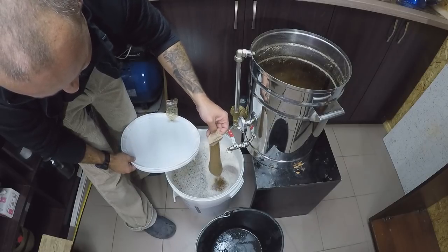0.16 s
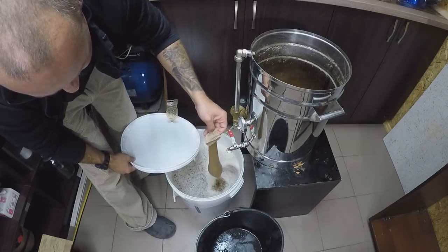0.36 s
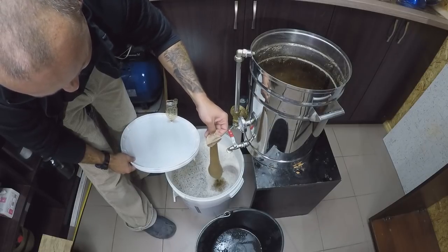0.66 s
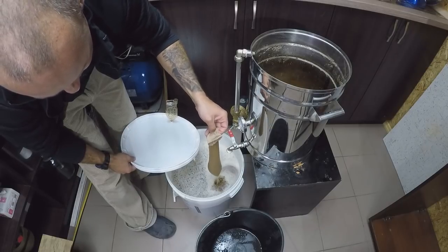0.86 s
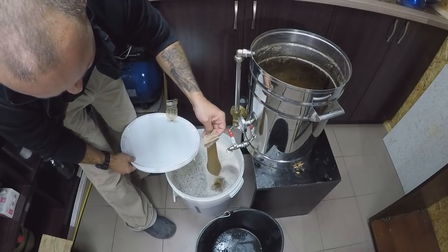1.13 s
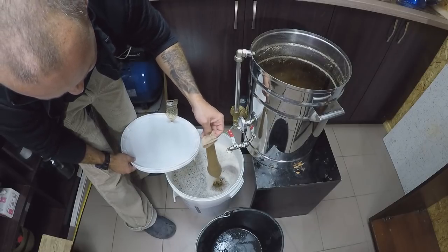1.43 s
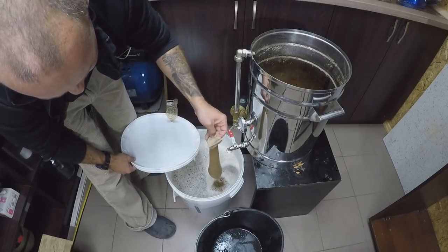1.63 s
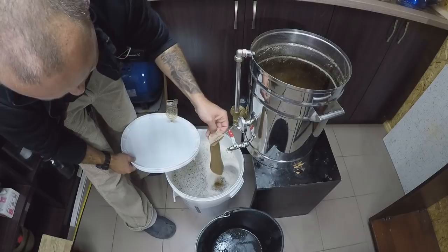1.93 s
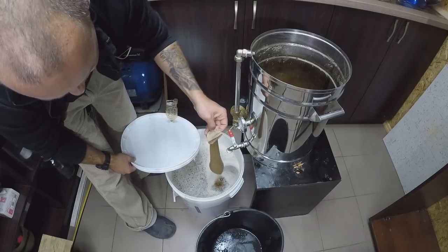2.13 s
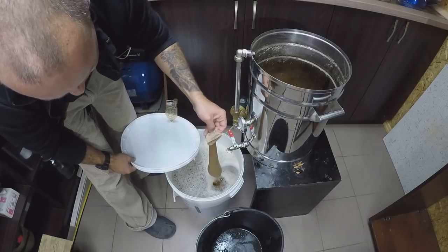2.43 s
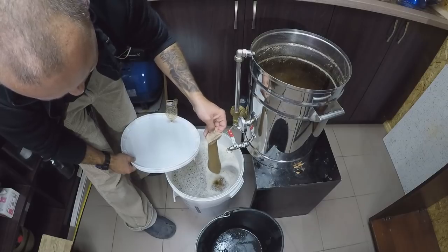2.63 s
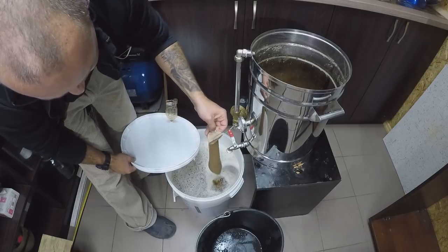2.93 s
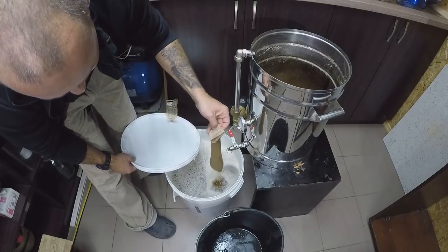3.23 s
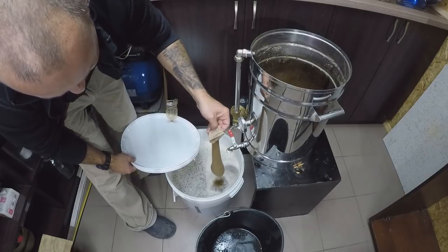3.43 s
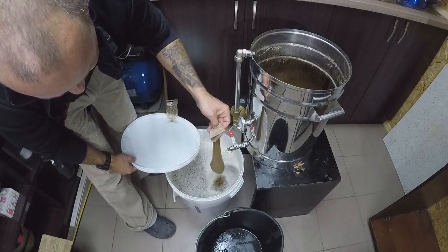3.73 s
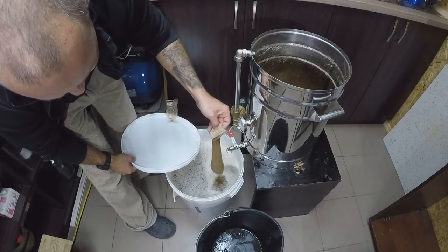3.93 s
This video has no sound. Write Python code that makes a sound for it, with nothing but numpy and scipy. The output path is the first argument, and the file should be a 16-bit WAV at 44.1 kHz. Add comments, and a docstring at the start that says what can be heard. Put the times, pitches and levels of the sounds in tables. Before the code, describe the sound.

A close stereo pickup of dripping in a hard-floored kitchen: quick clusters of high, glassy drops and rounder low plops fall into liquid, each with a tiny click, spray and fizzing bubbles. An opening cluster gives way to soft rubbing and two muffled bumps, then steady uneven dripping continues to the end. Quiet low room hum and a thin high whistle stay constant; bucket reflections and a short tail colour the drops.

```python
"""Kitchen with a tiled floor: liquid drips from a wet cloth filter into a half-full bucket.
Drops ring as short gliding sines, with clicks, spray, ticks and a trickle of small bubbles.
Early bounces and a decaying noise tail throw the water back to the two ports of a small camera.
Filtered noise makes a soft hum, a thin whistle, a narrow hiss and a dull rustle;
two low damped sines make the bumps."""
import sys
import numpy as np
from scipy import signal
from scipy.fft import rfft, irfft, next_fast_len
from scipy.io import wavfile

SR = 44100
rng = np.random.default_rng(int(sys.argv[2]) if len(sys.argv) > 2 else 0)


def dump_mix(stems):
    """Bounce the given channels to the path in sys.argv[1] as a 16-bit WAV at rate SR."""
    frames = np.atleast_2d(stems).T  # one column per channel
    limited = np.clip(frames, -1, 1)  # hard clip at full scale
    pcm = np.round(limited * 32767).astype(np.int16)
    wavfile.write(sys.argv[1], SR, pcm)


def field_ratio(decibels):
    """Amplitude ratio for a level in dB (20 dB per decade); scalars and array-likes work."""
    return 10 ** (np.asarray(decibels, dtype=float) / 20)


N = 179284
SIZE = next_fast_len(N + SR)   # FFT length, padded by 1 s
HZ = np.maximum(np.arange(SIZE // 2 + 1) * SR / SIZE, 1)

# loud bubbles, levels at the source: start_s, peak_db, pitch_hz
LOUD_BUBBLES = [(0.002, -40.5, 3470), (0.004, -48, 4700), (0.003, -49, 2680), (0.029, -51, 940),
                (0.0401, -41, 3315), (0.0535, -41.5, 1100), (0.0726, -37.5, 935), (0.1, -42.5, 930),
                (0.122, -50, 2100), (0.14, -57, 2130), (1.2467, -44, 1870), (1.015, -49, 1870),
                (1.484, -47, 1490), (1.511, -46, 2400), (2.2905, -42, 1085), (2.465, -48, 2430),
                (3.69, -55, 2290), (3.745, -45.5, 1890), (3.789, -57, 2030), (0.404, -50, 1200),
                (0.442, -49, 1180), (0.485, -47, 1200), (0.471, -48, 1600), (0.409, -52, 1600),
                (0.505, -53, 740), (0.31, -51, 1040), (0.495, -49, 780), (0.1534, -45.5, 7050),
                (0.6295, -44, 2130), (0.709, -46.5, 1344), (0.9146, -45, 2050), (1.0514, -42, 2990),
                (1.076, -44, 2690), (1.206, -51, 5940), (1.4183, -59, 1640), (1.441, -49, 1080),
                (1.5601, -47, 1730), (1.604, -45.5, 3430), (1.804, -50, 1320), (1.804, -46.5, 2000),
                (1.823, -50, 3130), (2.15, -50, 4430), (2.898, -46, 4600), (3.177, -49, 5470),
                (3.28, -44, 4570), (3.555, -47.5, 5500), (3.5735, -47, 2600), (3.6567, -46, 2560),
                (3.703, -43, 6450), (3.7692, -47, 1410), (3.755, -41.5, 7150), (3.936, -60, 2690),
                (0.1944, -36, 1501), (0.203, -43, 7670), (0.1724, -42, 3750), (0.196, -38.5, 4460),
                (0.205, -29, 3380), (0.4843, -43, 4300), (0.532, -38.5, 6770), (0.532, -42.5, 3750),
                (0.6314, -44.5, 1480), (0.706, -44, 910), (0.715, -42, 7570), (0.716, -43, 1710),
                (0.8511, -38, 3526), (0.8502, -43, 8700), (0.852, -42.5, 1980), (0.881, -45, 1450),
                (2.237, -47.5, 7000), (0.8885, -41.5, 2350), (0.8885, -38, 7300), (0.917, -40, 6850),
                (0.9623, -51, 870), (0.972, -39, 6400), (1.016, -41, 7070), (1.0124, -37.5, 3650),
                (1.0186, -28, 3120), (1.015, -46, 1265), (1.03, -45, 1290), (1.0765, -40, 1720),
                (1.188, -43.5, 7450), (1.1872, -42, 3530), (1.2048, -38, 1367), (1.215, -41, 5600),
                (1.232, -41, 7200), (1.2467, -31.5, 6080), (1.248, -31.5, 7260), (1.245, -40.5, 1310),
                (1.222, -43, 1340), (1.2465, -33, 3365), (1.313, -34.5, 2080), (1.33, -43, 2100),
                (1.3134, -33.5, 6640), (1.3119, -37.5, 1372), (1.3555, -42.5, 2940), (1.4188, -40, 6500),
                (1.4888, -44, 1147), (1.5087, -39.5, 2000), (1.505, -49, 7000), (1.519, -45.5, 5470),
                (1.553, -41.5, 4650), (1.5612, -41.5, 6740), (1.589, -37, 7040), (1.6226, -46, 1510),
                (1.6246, -37.5, 5500), (1.6966, -54.5, 3520), (1.717, -42.5, 4400), (1.535, -45, 2120),
                (1.698, -44.5, 1880), (1.6987, -36, 6440), (1.709, -44, 1870), (1.715, -44, 6440),
                (1.7446, -39, 1292), (1.745, -42, 2900), (1.908, -41.5, 3520), (1.927, -34, 7840),
                (1.932, -43, 7230), (1.9546, -40, 973), (1.961, -42, 2390), (1.9705, -38, 5280),
                (1.995, -38, 2300), (2.0016, -35, 7100), (2.1048, -39.5, 1820), (2.106, -35.5, 7040),
                (2.1297, -41.5, 2690), (2.2865, -34, 790), (2.2907, -38, 1402), (2.3111, -38, 2850),
                (2.3391, -36, 7250), (2.372, -45, 955), (2.32, -48, 797), (0.75, -50, 966),
                (1.99, -42, 910), (2.5414, -45.5, 1090), (2.5418, -42, 1900), (2.5432, -44, 3880),
                (2.5679, -34, 5740), (2.5877, -31.5, 1145), (2.5895, -27.5, 2406), (2.592, -32.5, 1670),
                (2.618, -39, 5630), (2.6174, -30, 3610), (2.631, -36, 820), (2.676, -37.5, 1286),
                (2.6839, -41.5, 810), (2.743, -44.5, 1420), (2.7445, -30, 6960), (2.7448, -29, 3070),
                (2.9272, -36.5, 3350), (2.945, -42, 2870), (2.9732, -37, 893), (2.987, -33.5, 2980),
                (3.004, -33.5, 6760), (3.0475, -31.5, 982), (3.0504, -37.5, 5530), (3.1011, -37, 5860),
                (3.105, -42, 2920), (3.1348, -40, 7270), (3.152, -40.5, 3450), (3.245, -43.5, 7840),
                (3.255, -41, 2720), (3.2539, -43, 1970), (3.28, -36.5, 6130), (3.29, -38, 6630),
                (3.3141, -43.5, 866), (3.3265, -36.5, 7440), (3.327, -46, 2910), (3.353, -32.5, 3300),
                (3.355, -31.5, 6200), (3.425, -44, 703), (3.4335, -45, 3080), (3.434, -46, 1110),
                (3.5577, -50.5, 8700), (3.5855, -43.5, 6100), (3.602, -41.5, 3420), (3.6215, -42, 3230),
                (3.6353, -42, 6100), (3.6574, -37.5, 4220), (3.675, -38, 7400), (3.675, -37, 3170),
                (3.7002, -43, 1730), (3.7311, -38.5, 2070), (3.729, -46, 5600), (3.772, -42.5, 2500),
                (3.808, -45, 2630), (3.8266, -30, 5940), (3.831, -31, 6960), (3.8294, -40, 3470),
                (3.828, -42, 1310), (3.957, -46, 3520), (3.9645, -31.5, 3480), (3.964, -43, 5900),
                (3.9741, -38, 854)]
# colour of slaps and spray: freq_hz, gain_db
SPLASH_COLOUR = [(500, -25), (1000, -13), (2400, 1), (3500, 11.5), (4800, 5), (7150, 22), (9500, -3),
                 (12500, -5.5), (15500, -15)]


def in_time(rows):
    """Curve read at every sample."""
    return np.interp(np.arange(N) / SR, *np.transpose(rows))


def at_hz(points, hz, axis=1):
    """Table column read on a log-frequency axis."""
    points = np.array(points)
    return np.interp(np.log(hz), np.log(points[:, 0]), points[:, axis])


def rms_one(x):
    """Scaled to rms 1."""
    return x / np.sqrt(np.mean(x ** 2) + 1e-20)


def shaped(x, response):
    """x through a frequency response given on HZ."""
    return irfft(rfft(x, SIZE) * response, SIZE)[..., :N]


def drift(rate_hz):
    """Random curve: straight lines between unit-variance knots, rate_hz knots a second."""
    knots = rng.standard_normal(int(N / SR * 60) + 2)
    return np.interp(np.arange(N) / SR * rate_hz, np.arange(len(knots)), knots)


def spread(pair, side_gain):
    """Two unrelated sounds become mid and side, then left and right."""
    # left port weaker near 8 kHz: freq_hz, half of left-minus-right db
    left = field_ratio(at_hz([(7000, -0.2), (8400, -2.5), (10500, -0.8), (14000, 0.5)], HZ))
    mid, side = pair[0], shaped(pair[1], side_gain)
    return shaped(np.array([mid + side, mid - side]), np.array([left, 1 / left]))


def add(out, start_s, peak_db, hz, cycles, rise, onset_cycles=0.57):
    """Adds a sine that swells, falls 20 dB in `cycles`, and glides by `rise` of its pitch a cycle."""
    at = max(int(start_s * SR), 0)
    cycles = np.clip(cycles, 1, 40)
    turn = np.arange(int(3 * cycles * SR / hz)) * hz / SR   # elapsed cycles
    shape = (1 - np.exp(-turn / onset_cycles)) * field_ratio(-20 * turn / cycles)
    phase = 2 * np.pi * (turn + rise * turn ** 2 / 2)
    tone = shape / shape.max() * np.sin(phase)
    out[at:at + len(tone)] += field_ratio(peak_db) * tone[:max(N - at, 0)]


def air():
    """Steady room tone: coloured noise with a slight level flutter."""
    # spectrum shape: freq_hz, relative_db_per_hz
    air_colour = [(25, -35), (100, -30), (113, -54), (137, -2.5), (170, -1), (300, -6.5), (560, -14),
                  (1200, -20.5), (1900, -26), (3400, -23), (5000, -31), (7450, -23), (8850, -25.5),
                  (12800, -33), (15500, -44)]
    level_db = -53.5 + 0.68 * drift(27.0)
    noise = rng.standard_normal((2, N))
    return field_ratio(level_db) * rms_one(shaped(noise, field_ratio(at_hz(air_colour, HZ))))


def whistles():
    """Noise through narrow resonances, stronger on the right and inverted on the left."""
    # thin whistle, narrow hiss: freq_hz, right_db, width_hz, left_minus_right_db
    lines = [(8104, -70, 8, -4), (8560, -63, 220, -10)]
    out = 0
    for hz, right_db, width_hz, pan_db in lines:
        resonance = 1 / (1 + (2 * (HZ - hz) / width_hz) ** 2)
        line = rms_one(shaped(rng.standard_normal(N), resonance))
        out = out + field_ratio(right_db) * line * np.array([[-field_ratio(pan_db)], [1]])
    return out


def drops(bubbles):
    """Each trapped bubble rings as a damped sine, with glide and ring length a little its own."""
    # typical ring length until 20 dB down: pitch_hz, length_cycles
    ring_cycles = [(800, 9.7), (1300, 15.5), (2300, 7.3), (3500, 19.5), (6500, 23), (9000, 42)]
    # typical glide, lowest sag and highest climb: pitch_hz, pitch_share_per_cycle
    glide = [(800, -0.0019), (1500, 0.00042), (3000, -0.00074), (7000, 0.0015)]
    out = np.zeros(N)
    chances = rng.standard_normal((len(bubbles), 2))
    for (start_s, peak_db, hz), (bend, length) in zip(bubbles, chances):
        cycles = at_hz(ring_cycles, hz) * np.exp(0.49 * length)
        rise = at_hz(glide, hz) + 0.0012 * bend
        add(out, start_s - 0.3 / hz, peak_db, hz, cycles, rise)
    return out


def siblings(count=4, mean_lag_s=0.0074, range_octaves=0.618, range_db=13.0):
    """Air dragged under breaks up: a few bubbles of like size soon follow; rows like LOUD_BUBBLES."""
    # mid level against the main bubble: pitch_hz, level_db
    breakup = [(900, -25.5), (1800, -15.5), (3200, -13), (5500, -10), (9000, -13)]
    late, pitch, loud = np.moveaxis(rng.random((len(LOUD_BUBBLES), count, 3)), -1, 0)
    main_s, main_db, main_hz = np.transpose(LOUD_BUBBLES)[..., None]
    start_s = main_s - mean_lag_s * np.log(late)
    peak_db = main_db + at_hz(breakup, main_hz) + range_db * (loud - .5)
    hz = main_hz * 2 ** (range_octaves * (pitch - .5))
    return np.reshape([start_s, peak_db, hz], (3, -1)).T


def trickle(count=3200):
    """Small bubbles at random moments and pitches, louder as the flow swells; rows like LOUD_BUBBLES."""
    # strength of the flow, only its swing about the mean counts: time_s, level_db
    flow = [(0.0, -35), (0.07, -48), (0.3, -51.5), (0.94, -44), (1.11, -49), (1.34, -48), (1.41, -51),
            (1.55, -48.5), (1.86, -52), (2.22, -47.5), (2.35, -50.5), (3.08, -47.5), (3.2, -51),
            (3.27, -44), (3.5, -60), (3.61, -48), (3.78, -52.5), (3.9, -50), (4.06, -39)]
    # colour: pitch_hz, gain_db
    trickle_colour = [(800, -5), (1500, -4), (3000, -1.5), (4500, -3.5), (7000, 7), (9500, -11.5)]
    mean_db, range_db, flow_gain = -61, 16, 0.81   # mean before colour
    low_hz, high_hz = 800, 9500
    when, pitch, loud = rng.random((count, 3)).T
    start_s = when * N / SR
    swing_db = np.interp(start_s, *np.transpose(flow)) - in_time(flow).mean()
    peak_db = mean_db + flow_gain * swing_db + range_db * (loud - .5)
    hz = low_hz * (high_hz / low_hz) ** pitch
    return np.transpose([start_s, peak_db + at_hz(trickle_colour, hz), hz])


def slaps(bubbles, slap_db=0, db_per_octave=8):
    """A drop meeting the surface clicks: a coloured impulse, stronger for high-pitched drops."""
    # drops that land flat, level before colour: start_s, click_db
    smacks = [(0.851, -41), (1.0135, -37), (1.2455, -25), (1.2488, -34), (1.3122, -33), (2.7445, -57),
              (3.354, -33), (3.826, -39)]
    out = np.zeros(N)
    for start_s, peak_db, hz in bubbles:
        at = min(int((start_s - .7 / hz) * SR), N - 1)
        out[at] += field_ratio(peak_db + slap_db + db_per_octave * np.log2(hz / 4000))
    for start_s, click_db in smacks:
        out[int(start_s * SR)] += field_ratio(click_db)
    return shaped(out, field_ratio(at_hz(SPLASH_COLOUR, HZ)))


def spray(count=16, mean_lag_s=.022, offset_db=-26.5):
    """Each loud drop throws up droplets that fall back soon after and trap quieter bubbles."""
    out = np.zeros(N)
    draws = rng.random((len(LOUD_BUBBLES), count, 4))
    for (start_s, peak_db, hz), droplets in zip(LOUD_BUBBLES, draws):
        for late, pitch, loud, length in droplets:
            small_hz = np.clip(hz * 3.5 ** (pitch - .45), 600, 14000)
            colour_db = at_hz(SPLASH_COLOUR, small_hz) - at_hz(SPLASH_COLOUR, hz)
            small_db = peak_db + offset_db + colour_db + 4.2 * loud ** 2
            small_s = start_s - mean_lag_s * np.log(late)
            add(out, small_s, small_db, small_hz, 8.8 + 2.2 * length, .004)
    return out


def ticks(cycles=4.0):
    """Tiny droplets burst, ringing so briefly that they only tick."""
    # levels at the source: start_s, peak_db, pitch_hz
    bursts = [(0.0836, -42.5, 11400), (0.179, -43, 10400), (0.889, -38, 10600), (1.0121, -41, 12700),
              (1.0184, -40, 12500), (0.851, -44, 12500), (1.2455, -37, 11300), (1.312, -45, 10900),
              (1.4321, -45, 11100), (1.5933, -42, 12100), (1.701, -35.5, 10600), (1.9704, -42, 13300),
              (2.2872, -43, 12600), (2.5656, -44, 10800), (2.7445, -40, 11800), (3.0016, -45, 13300),
              (3.1346, -41, 10900), (3.6346, -46, 11000), (3.6567, -39, 11000), (3.731, -44, 10700),
              (3.7534, -43, 9900), (3.9694, -35.5, 9600)]
    out = np.zeros(N)
    for start_s, peak_db, hz in bursts:
        add(out, start_s, peak_db, hz, cycles, 0, onset_cycles=1.0)
    return out


def rustle():
    """Short dull rubbing: grainy coloured noise with a few held pitches."""
    # level course before flutter: time_s, level_db
    course = [(.27, -66), (.31, -57.5), (.36, -51.5), (.42, -54), (.5, -51.5), (.56, -55), (.62, -56),
              (.7, -69)]
    # colour: freq_hz, gain_db
    rub_colour = [(150, -45), (250, 2), (450, 7), (750, 5), (1300, 5.5), (1800, -1), (2500, -13),
                  (3300, -28)]
    # held pitches: freq_hz, extra_gain (linear), half_width_hz
    held = [(741, 4.3, 11), (1200, 0.98, 8.2), (1600, 1.8, 11.6), (2434, 8, 8.4)]
    peaks = sum(gain / (1 + ((HZ - hz) / half_hz) ** 2) for hz, gain, half_hz in held)
    band = field_ratio(at_hz(rub_colour, HZ)) * (1 + peaks)
    grains = rng.standard_normal((2, N)) * field_ratio(1.34 * drift(45.0))
    level_db = in_time(course) + 0.25 * drift(55.0)
    return field_ratio(level_db) * rms_one(shaped(grains, band))


def thuds():
    """Soft low bumps: a padded blow on something hollow, two damped sines thinned below 140 Hz."""
    # lower sine, level before the high-pass: start_s, peak_db, pitch_hz, cycles_to_minus_20_db
    blows = [(0.312, -33, 196.5, 3), (0.556, -32.5, 190, 5)]
    out = np.zeros(N)
    for start_s, peak_db, hz, cycles in blows:
        add(out, start_s - .004, peak_db, hz, cycles, -.01, onset_cycles=3.7)
        add(out, start_s - .004, peak_db - 9.0, 1.55 * hz, 4.0, 0, onset_cycles=2.3)
    return signal.sosfilt(signal.butter(8, 140, "high", fs=SR, output="sos"), out)


def direct(x):
    """Straight path and early bounces reach the two ports with unequal level and phase."""
    # port difference: freq_hz, left_minus_right_db, right_lead_rad
    port_side = [(470, 4, 1.6), (790, -5, 1.9), (1157, -3, 1.5), (1800, -3.5, 0.4), (2640, -1, 0.48),
                 (6000, 2, 0.8), (7340, 0, 2), (8420, 2, 4.1), (12000, -7, 7), (13800, -4, 11)]
    # bounces off bucket wall, floor and kettle: delay_s, level_db
    early = [(0.0013, -34), (0.0029, -13), (0.005, -10), (0.0074, -35), (0.0101, -14.5), (0.0138, -10)]
    tilt = field_ratio(at_hz(port_side, HZ) / 2) * np.exp(-.5j * at_hz(port_side, HZ, axis=2))
    bounce = 1
    for k, (delay_s, level_db) in enumerate(early):
        bounce = bounce + (-1) ** k * field_ratio(level_db) * np.exp(-2j * np.pi * HZ * delay_s)
    return shaped(x, np.array([tilt, 1 / tilt]) * bounce)


def kitchen(x, ramp_s=0.0015, lumpy_db=-3.0):
    """Convolves with two unrelated noise tails, each octave decaying at its own pace, plus held pitches."""
    # decay: freq_hz, t60_s
    room_t60 = [(300, 0.29), (1000, 0.33), (3000, 0.27), (7000, 0.25), (13000, 0.29)]
    # pitches that bucket and room hold on to: pitch_hz
    rings_hz = [767, 836, 872, 946, 982, 1124, 1181, 1268, 1332, 1459, 1590, 1734, 1905, 2030, 2083, 2401,
                2468, 2547, 2713, 2861]
    # echo strength: freq_hz, gain_db
    wet = [(300, -21), (900, -33.5), (2000, -26), (3500, -26), (7000, -23.5), (12000, -23)]
    ring_1khz_db, ring_db_per_octave, ring_t60_s = -19.5, -3, 0.2   # level before wet
    t = np.arange(SR // 2) / SR
    onset = np.clip(t / ramp_s - .3, 0, 1)
    echoes = rng.standard_normal((2, len(t))) * field_ratio(lumpy_db * rng.standard_normal((2, len(t))))
    tail = 0
    for low_hz in 100 * 2. ** np.arange(8):
        edges_hz = [low_hz, min(2 * low_hz, .45 * SR)]
        band = signal.butter(2, edges_hz, "band", fs=SR, output="sos")
        decay = field_ratio(-60 * t / at_hz(room_t60, low_hz))
        tail = tail + signal.sosfilt(band, rms_one(echoes) * onset) * decay
    for hz, turns in zip(rings_hz, rng.random((len(rings_hz), 2, 1))):
        ring_db = ring_1khz_db + ring_db_per_octave * np.log2(hz / 1000) - 60 * t / ring_t60_s
        tail = tail + field_ratio(ring_db) * onset * np.sin(2 * np.pi * (hz * t + turns))
    return shaped(x, rfft(tail, SIZE) * field_ratio(at_hz(wet, HZ)))


def scene():
    """Water direct and echoed, bumps and rustle, over room tone and whistles."""
    # left-right likeness of the room tone, clipped below: freq_hz, correlation
    likeness = [(150, -0.095), (300, -0.32), (650, -0.9), (1200, -0.95), (2100, -0.66), (3700, 0.78),
                (5500, -0.055), (7300, 0.1), (8600, 0.03), (10500, -0.17), (14000, 0.67)]
    # width of echoes and rustle: freq_hz, side_minus_mid_db
    tail_side = [(300, -5), (1000, -0.5), (2000, -1), (3700, -9), (5500, -2), (8000, -5), (13000, 5.5)]
    bubbles = np.vstack([LOUD_BUBBLES, siblings(), trickle()])
    water = drops(bubbles) + slaps(LOUD_BUBBLES) + spray() + ticks()
    bumps = thuds()
    near = kitchen(water + field_ratio(-9) * bumps) + rustle()
    alike = np.clip(at_hz(likeness, HZ), -.8, .9)
    room = spread(air(), np.sqrt((1 - alike) / (1 + alike)))
    echoed = spread(near, field_ratio(at_hz(tail_side, HZ)))
    return direct(water) + bumps + echoed + room + whistles()


def band_limit(x):
    """A steep low-pass at the top of the band."""
    return signal.sosfilt(signal.butter(12, 16400, fs=SR, output="sos"), x)


def record(dry):
    """The camera cuts the top steeply: 60 dB down from 16.3 kHz."""
    cut = signal.cheby2(12, 60, 16300, fs=SR, output="sos")
    mix = signal.sosfilt(cut, dry)
    return band_limit(mix)


dry = scene()
out = record(dry)
dump_mix(out)
```